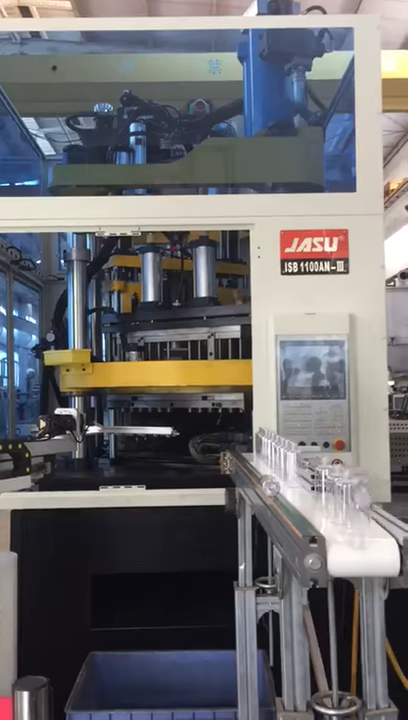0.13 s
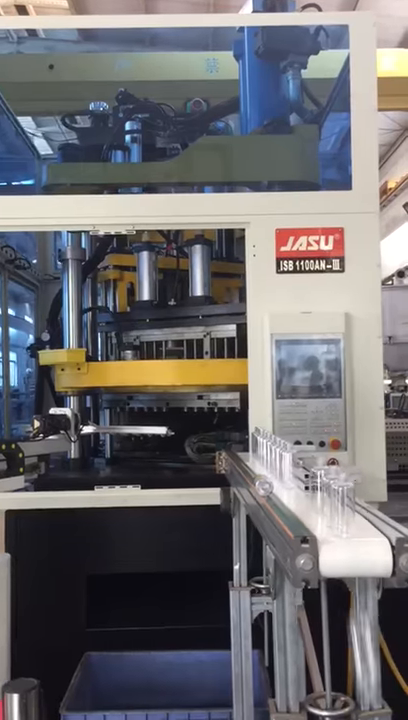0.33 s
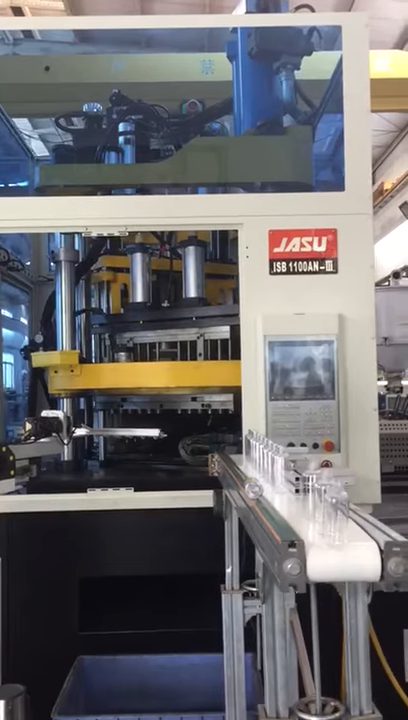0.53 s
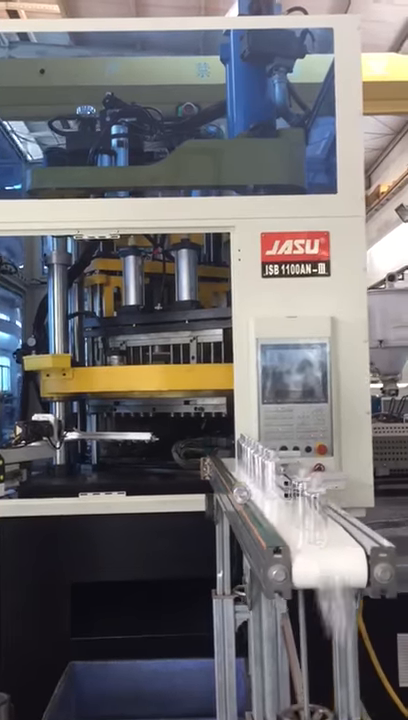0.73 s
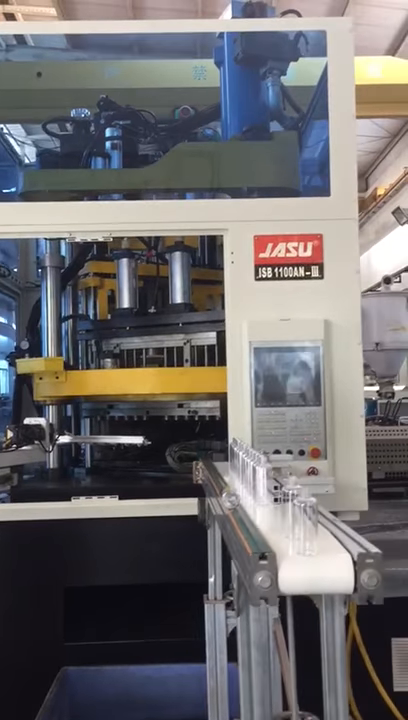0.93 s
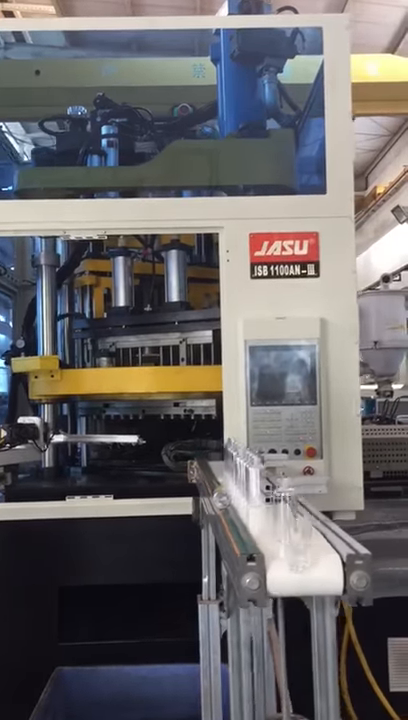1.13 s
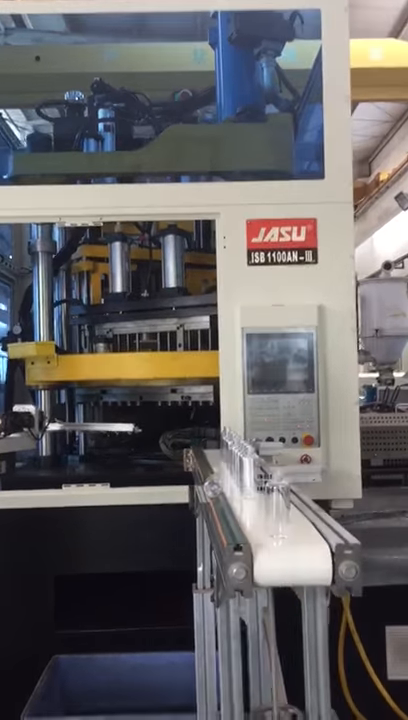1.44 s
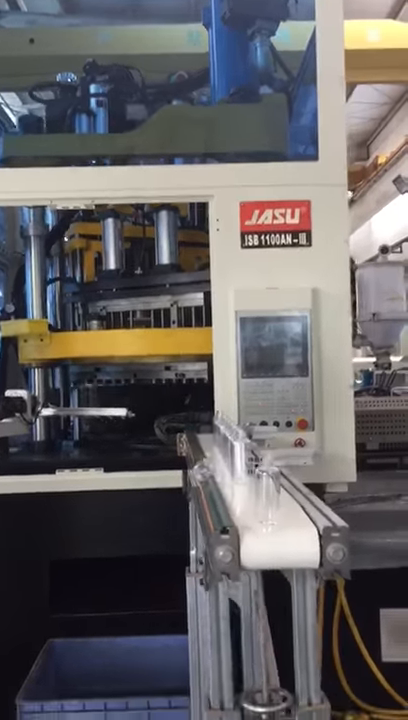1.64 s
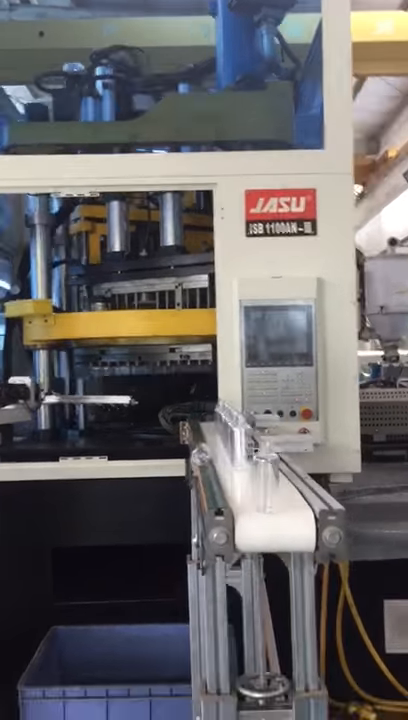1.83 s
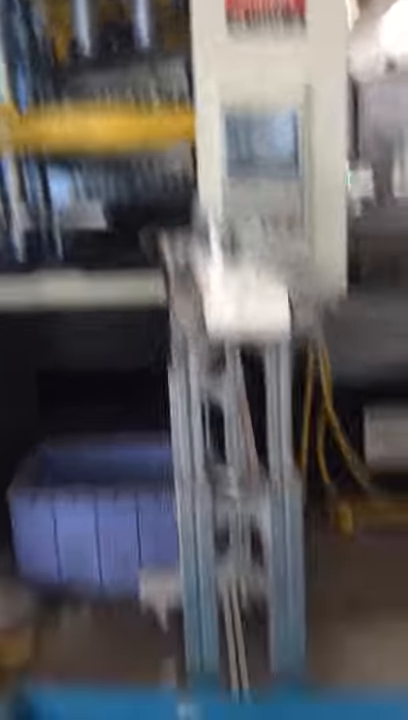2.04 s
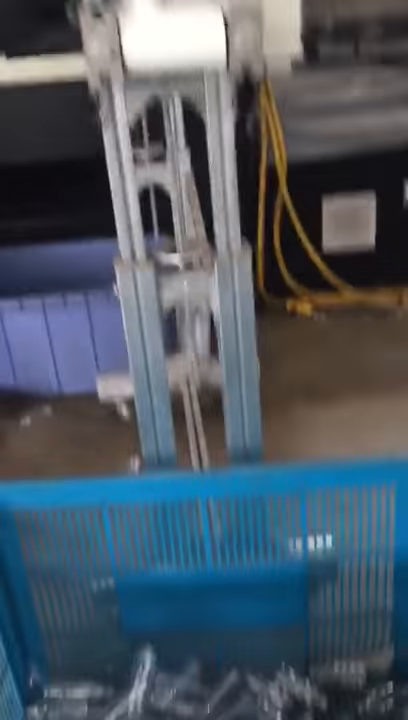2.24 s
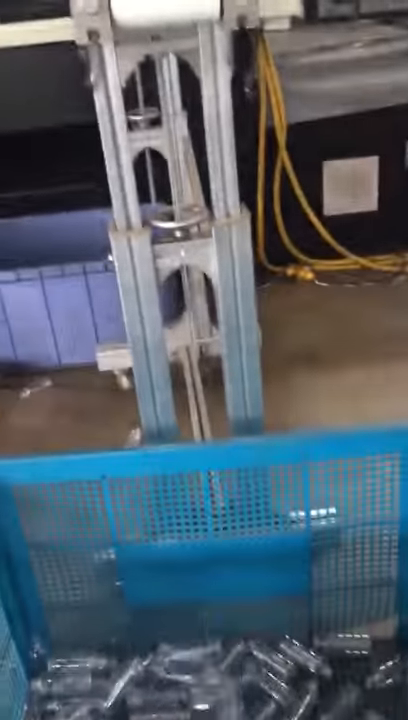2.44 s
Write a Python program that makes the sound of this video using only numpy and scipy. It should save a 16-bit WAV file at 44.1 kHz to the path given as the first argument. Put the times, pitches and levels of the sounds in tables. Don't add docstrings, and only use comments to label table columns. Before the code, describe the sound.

In a reverberant factory hall, a phone nearby picks up steady machine roar, humming fans and pump, and hissing air, while light empty bottles knock, tick and tumble into a crate, ending with more clatter and stronger hiss.

```python
import sys
import numpy as np
from scipy import signal
from scipy.fft import rfft, irfft
from scipy.io import wavfile
from scipy.ndimage import uniform_filter1d

SR = 44100
rng = np.random.default_rng(int(sys.argv[2]) if len(sys.argv) > 2 else 0)


def dump(signal):
    limited = np.clip(np.atleast_2d(signal).T, -1, 1)
    pcm = np.round(limited * 32767).astype(np.int16)
    wavfile.write(sys.argv[1], SR, pcm)


def how_loud(loudness_db):
    steps = np.asarray(loudness_db, float) / 20
    return 10 ** steps


N = 114219


def evened(x):
    return x / np.sqrt(np.mean(x ** 2) + 1e-20)


def read(points, hz):
    f, value = np.transpose(points)
    return np.interp(np.log(hz + 1), np.log(f + 1), value)


def curve(table, column):
    rows = np.array(table)
    return np.interp(np.arange(N) / SR, rows[:, 0], rows[:, column])


def add(mix, start_s, sound):
    part = mix[round(start_s * SR):][:len(sound)]
    part += sound[:len(part)]


def resonate(x, hz, width_hz):
    turn = np.exp(2j * np.pi * np.cumsum(hz * np.ones(len(x))) / SR)
    r = np.exp(-np.pi * width_hz / SR)
    return 2 * (turn * signal.lfilter([1 - r], [1, -r], x / turn)).real


def resonate_twice(x, hz, width_hz):
    return resonate(resonate(x, hz, width_hz), hz, width_hz)


def coloured(x, db_of):
    hz = np.fft.rfftfreq(len(x), 1 / SR)
    return evened(irfft(rfft(x) * how_loud(db_of(hz)), len(x)))


# pitch_hz, level_db (per Hz)
ROAR_SPECTRUM = [(30, -2.5), (110, -0.5), (300, -1.5), (520, -11.5), (740, -10), (2400, -16), (4700, -25.5),
                 (11500, -36.5)]
# pitch_hz, width_hz, level_db
FRAME_RESONANCES = [(106, 148, -33.5), (163.7, 57, -31.5), (369.5, 64, -30), (2220, 300, -79),
                    (4103, 180, -47), (11520, 3600, -82.5)]


def roar():
    roar_db, patch_db, swell_db = -25, 1.5, 1.05
    frames, hz = N // 256 + 5, np.fft.rfftfreq(1024, 1 / SR)
    a, b, patches = rng.standard_normal((frames, 513, 3)).T
    patches = uniform_filter1d(patches, size=12, axis=0)
    patches = evened(uniform_filter1d(patches, size=14, axis=1))
    swell = evened(uniform_filter1d(rng.standard_normal(frames), size=20))
    level_db = read(ROAR_SPECTRUM, hz)[:, None] + patch_db * patches + swell_db * swell
    z = (a + 1j * b) * how_loud(level_db)
    out = how_loud(roar_db) * evened(signal.istft(z, nperseg=1024, noverlap=768)[1][:N])
    for f, width_hz, db in FRAME_RESONANCES:
        out += how_loud(db) * evened(resonate_twice(rng.standard_normal(N), f, width_hz))
    return out


def hum(hz, width_hz, share):
    phase = np.cumsum(hz * np.ones(N)) / SR + rng.random()
    steady = np.sqrt(2) * np.sin(2 * np.pi * phase)
    wavering = evened(resonate_twice(rng.standard_normal(N), hz, width_hz))
    return np.sqrt(1 - share ** 2) * steady + share * wavering


# pitch_hz, level_db, waver_width_hz, wavering_share
BLOWER_HUMS = [(359, -42, 5.5, 0.97), (830, -51, 7.2, 1), (8020, -64.5, 6, 0.4)]


def blowers():
    return sum(how_loud(db) * hum(hz, width_hz, share) for hz, db, width_hz, share in BLOWER_HUMS)


# start_s, first_level_db, second_level_db
FAN_LEVELS = [(.1, -28, -34), (.7, -34, -29), (1.3, -29, -29.5), (1.9, -31.5, -32.5), (2.2, -25.5, -29),
              (2.59, -28.5, -25)]
FAN_PITCHES = [187.9, 210.0]


def fans():
    return sum(how_loud(curve(FAN_LEVELS, k + 1)) * hum(hz, 2.9, 0.15) for k, hz in enumerate(FAN_PITCHES))


# start_s, pitch_hz, level_db
PUMP_TONE = [(0.1, 295.2, -34.5), (0.2, 293, -20), (0.37, 297, -31.5), (0.4, 301, -25),
             (0.63, 294.4, -24.5), (0.83, 296.5, -36.5), (1.08, 293.5, -25.5), (1.11, 293.2, -36.5),
             (1.33, 297.0, -20.5), (1.54, 294.7, -31.5), (1.58, 295.3, -25.5), (1.9, 293.5, -31),
             (2.01, 298.3, -22.5), (2.07, 307.8, -37), (2.18, 289.4, -24.5), (2.2, 293.6, -28.5),
             (2.46, 300.5, -37), (2.58, 293.8, -20.5)]


def pump():
    hz, level_db = curve(PUMP_TONE, 1), curve(PUMP_TONE, 2)
    octave_db = -38 + 0.088 * (level_db + 30)
    return how_loud(level_db) * hum(hz, 2.2, 0.041) + how_loud(octave_db) * hum(2 * hz, 16.5, 0.7)


# start_s, second_order_level_db, third_order_level_db
MOTOR_ORDERS = [(.1, -35, -46), (.45, -32, -39.5), (.65, -35.5, -43), (.95, -37, -35), (1.1, -39, -37.5),
                (1.3, -36.5, -38.5), (1.45, -40, -35.5), (1.6, -37.5, -39.5), (1.75, -42, -34),
                (2.05, -49, -38.5), (2.12, -41, -40), (2.22, -32, -34), (2.36, -51, -57), (2.59, -45, -50)]


def motor():
    shaft_hz = 326.6
    return sum(how_loud(curve(MOTOR_ORDERS, k)) * hum((k + 1) * shaft_hz, 8, 0.15) for k in (1, 2))


# start_s, level_db
AIR_LEVEL = [(.1, -35), (.7, -36.5), (1.3, -33), (2.05, -45), (2.13, -33.5), (2.22, -29), (2.32, -31),
             (2.42, -32), (2.535, -31.5), (2.55, -22), (2.59, -21.5)]
# pitch_hz, level_db
AIR_SPECTRUM = [(400, -39), (1200, 7), (2800, 1), (4500, -8), (7000, -12), (12000, -27.5)]


def air():
    hiss = coloured(rng.standard_normal(N), lambda hz: read(AIR_SPECTRUM, hz))
    return how_loud(curve(AIR_LEVEL, 1)) * hiss


def ring(t, hz, db, t60_s):
    swell = (1 - np.exp(-t * hz / 3)) ** 2
    return swell * how_loud(db - 60 * t / t60_s) * np.sin(2 * np.pi * hz * t)


# pitch_hz, level_db, t60_s
BOTTLE_MODES = [(1750, -4.5, 0.03), (2166, -13.5, 0.15), (3907, 8, 0.014), (3853, -7.5, 0.059),
                (6050, 2.5, .012), (8200, -9, 0.023)]


def knock(db, t60_s, tilt_db, ring_db):
    grains_per_s, thin_below_hz, treble_from_hz = 6000, 1220, 5300
    treble_t60_share, rise_s = 0.74, 0.001
    t = np.arange(12000) / SR

    def tilt(hz):
        thinning_db = 10 * np.log10(1 + (thin_below_hz / (hz + 1)) ** 4)
        return tilt_db * np.log2(hz / 2000 + 0.078) - thinning_db

    size, chance = rng.standard_normal(len(t)), rng.random(len(t))
    grains = coloured(size * (0.5 + (chance < grains_per_s / SR)), tilt)
    low = signal.sosfilt(signal.butter(2, treble_from_hz / SR * 2, output="sos"), grains)
    decay_db = -60 * t / t60_s
    treble = (grains - low) * how_loud(decay_db * (1 / treble_t60_share - 1))
    rattle = np.minimum(t / rise_s, 1) * how_loud(db + decay_db) * (low + treble)
    return rattle + sum(ring(t, hz, ring_db + d, decay_s) for hz, d, decay_s in BOTTLE_MODES)


# start_s, level_db, t60_s, tilt_db (per octave), hollow_ring_db
CLATTERS = [(0.28, -21, 0.11, -5.5, -34), (.385, -28, 0.085, -6, -36), (0.401, -27.5, 0.18, -6.5, -40),
            (0.519, -33, 0.06, -9, -49), (.548, -21.5, 0.12, -10.5, -26), (.771, -18.5, 0.078, -10, -28),
            (.785, -18, 0.17, -5.5, -48), (.800, -26, 0.25, -8.5, -30), (.902, -29.5, 0.38, -8.5, -35),
            (1.077, -25.5, 0.07, -6, -42), (1.123, -22, 0.078, -12, -39), (1.2446, -10, 0.07, -4, -21),
            (1.257, -27, 0.088, -10, -37), (1.343, -29.5, 0.054, -6.5, -29), (1.513, -26, 0.23, -10, -45),
            (1.522, -28, 0.38, -3, -45), (1.535, -20.5, 0.3, -10.5, -48), (1.596, -22, 0.2, -14, -38),
            (1.7677, -6.5, 0.04, -4.5, -7), (1.780, -47, 0.17, -13, -47), (2.4449, -20.5, 0.16, -6.5, -26),
            (2.4637, -25, 0.098, -6.5, -40), (2.542, -23, 0.066, -17, -36), (2.578, -25, .1, -13, -30)]


def clatters(hits):
    for start_s, *row in CLATTERS:
        add(hits, start_s, knock(*row))


# start_s, pitch_hz, level_db,
# cycles (to fall 60 dB)
NECK_PINGS = [(0.28, 1600, -15, 87), (.548, 1022, -17, 60), (.771, 1780, -15, 50), (.787, 6050, -17.5, 86),
              (.787, 2240, -11, 52), (0.805, 6000, -20, 82), (0.904, 1830, -17, 85),
              (1.077, 1690, -7.5, 34), (1.2450, 9560, -10, 95), (1.2455, 6440, -4.5, 76),
              (1.2453, 4000, -7, 60), (1.2465, 2216, -8, 68), (1.252, 2870, -11, 65),
              (1.2505, 5200, -15, 83), (1.258, 1220, -13.5, 67), (1.343, 9050, -23, 80),
              (.995, 990, -17, 80), (1.004, 3380, -20, 50), (1.063, 890, -15, 27), (1.091, 1750, -22, 70),
              (1.124, 2630, -20, 60), (1.124, 1760, -16, 52), (1.514, 1300, -13, 30),
              (1.528, 1030, -15, 28), (1.534, 1080, -9, 35), (1.549, 2200, -16, 26), (1.551, 759, -12, 46),
              (1.521, 6300, -20, 120), (1.549, 6400, -21, 124), (1.573, 3770, -30, 60),
              (1.598, 2670, -24, 68),
              (1.7675, 780, -2, 15), (1.7675, 555, -3, 15), (1.7685, 1150, -6, 16), (2.29, 370, -20.5, 40),
              (3, 375, -14, 42), (2.548, 2300, -14, 40), (2, 3400, -15, 50), (2.2, 3000, -16, 50),
              (1.7695, 1760, -1, 34), (1.7760, 1900, -20, 110), (1.768, 2940, -6, 20),
              (1.7685, 4100, -9, 70), (1.7685, 9800, -14, 68), (1.75, 5600, -16, 90),
              (2.4462, 1640, -17, 26), (2.4635, 3900, 0.5, 65), (2.4635, 3700, -3, 31),
              (2.1, 4000, -18, 62), (2.4, 2760, -11, 54), (2.451, 1600, -15, 54), (2.42, 5300, -12, 38),
              (2.4634, 5740, -16.5, 100), (2.4650, 1701, -10, 83), (2.4650, 2600, -8, 50),
              (2.4807, 4100, -13, 53), (2.541, 3100, -11, 63), (2.542, 6800, -24, 70),
              (2.565, 5300, -20, 50), (2.572, 2150, -10, 53), (2.562, 860, -16, 94)]


def pings(hits):
    t = np.arange(8000) / SR
    for start_s, hz, db, cycles in NECK_PINGS:
        add(hits, start_s, ring(t, hz, db, cycles / hz))


def hall(x):
    t60_s, build_s = 0.43, 0.022
    t = np.arange(SR // 2) / SR
    dull = signal.lfilter([1], [1, -0.8], rng.standard_normal(len(t)))
    tail = dull * how_loud(-60 * t / t60_s) * np.minimum(t / build_s, 1)
    return signal.fftconvolve(x, tail / np.linalg.norm(tail))[:N]


def thump(db, t60_s, hz):
    pure, sag, sag_s, rise_s = 0.55, 0.15, 0.03, 0.0059
    t = np.arange(16000) / SR
    blur = evened(resonate_twice(rng.standard_normal(len(t)), hz, 0.5 * hz))
    bent_t = t + sag * sag_s * (1 - np.exp(-t / sag_s))
    tone = np.sin(2 * np.pi * hz * bent_t) * (hz < 450)
    body = evened(pure * tone + (1 - pure) * blur)
    return np.minimum(t / rise_s, 1) * how_loud(db - 60 * t / t60_s) * body


# level_db, t60_s
THUMP_LEVELS = [(-12.5, 0.18), (-14.5, 0.23), (-15.5, 0.16), (-16.5, 0.15), (-12, 0.18), (-20, 0.18),
                (-22, 0.2407), (-18.5, 0.14), (-27, 0.25), (-20, 0.24), (-7, 0.093), (-21, 0.1)]
THUMP_TIMES = [.993, 1.0, 1.06, 1.531, 1.55, .993, 2.06, 2.465, .52, 1.65, 1.533, 1.02]
THUMP_PITCHES = [350, 92, 140, 380, 95, 980, 75, 360, 1150, 115, 150, 250]


def thumps(hits):
    for start_s, hz, row in zip(THUMP_TIMES, THUMP_PITCHES, THUMP_LEVELS):
        add(hits, start_s, thump(*row, hz))


def scene():
    hits = np.zeros(N)
    clatters(hits)
    pings(hits)
    thumps(hits)
    machine = roar() + blowers() + fans() + pump() + motor() + air()
    return (hits + how_loud(-18) * hall(hits) + machine)[None]


# start_s, threshold_db (against the usual level)
TREBLE_THINNING = [(.1, -2.3), (.6, -2), (.8, -3.5), (1.7, -4.5), (1.95, -3.8), (2.3, -4), (2.59, -6)]


def starve(x):
    gate_from_hz, top_hz, top_wander_hz, top_db = 4600, 11930, 110, 14
    window = np.sin(np.pi * (np.arange(2048) + 0.5) / 2048)
    hz, t, z = signal.stft(x, SR, window=window, nperseg=2048, noverlap=1024)
    treble = hz > gate_from_hz
    power = uniform_filter1d(abs(z) ** 2, size=6, axis=0)
    usual = uniform_filter1d(np.median(power, axis=1), size=40)[:, None]
    quiet = np.minimum(np.median((power / (usual + 1e-20))[treble], axis=0) + 0.49, 1)
    top_edge_hz = top_hz + top_wander_hz * rng.standard_normal(len(t))
    top_usual = usual[np.argmax(hz > top_hz)] * how_loud(top_db)
    usual = np.where(hz[:, None] > top_edge_hz, top_usual, usual * quiet)
    over_db = 10 * np.log10(abs(power / usual) + 1e-12) - np.interp(t, *np.transpose(TREBLE_THINNING))
    keep = np.where(treble[:, None], np.clip(over_db + 0.5, 0, 1), 1)
    return signal.istft(z * keep, SR, window=window, nperseg=2048, noverlap=1024)[1][:N]


def roll_off(x):
    return signal.sosfilt(signal.butter(12, 12840, fs=SR, output="sos"), x)


def record(dry):
    low_cut_hz, ceiling, edge_hz = 55.4, 0.88, 11730
    start_s, start_fade_s, end_fade_s = 0.083, 0.00028, 0.002
    x = signal.sosfilt(signal.butter(4, low_cut_hz / SR * 2, "high", output="sos"), dry[0])
    x = ceiling * np.tanh(x / ceiling)
    x = signal.oaconvolve(x, signal.firwin(255, edge_hz, window=("kaiser", 8), fs=SR), "same")
    x = starve(x) * np.clip((np.arange(N) / SR - start_s) / start_fade_s, 0, 1)
    x = x * np.clip((N - np.arange(N)) / SR / end_fade_s, 0, 1)
    return roll_off(x[None])


dry = scene()
out = record(dry)
dump(out)
```